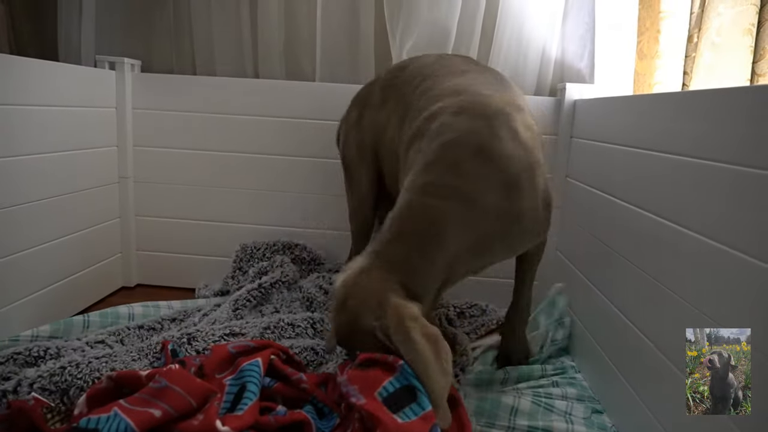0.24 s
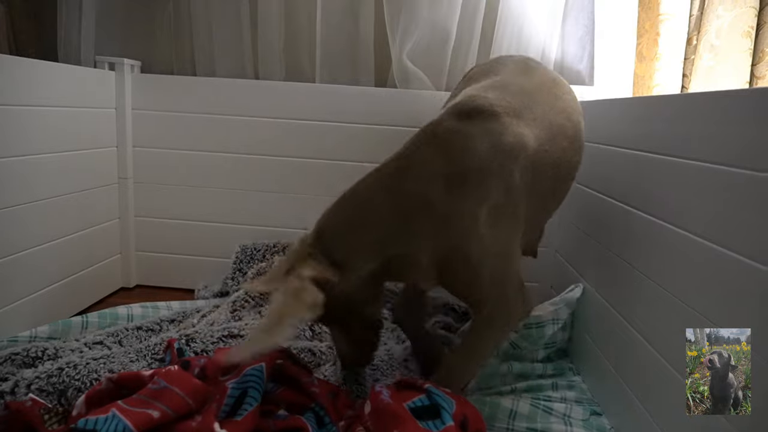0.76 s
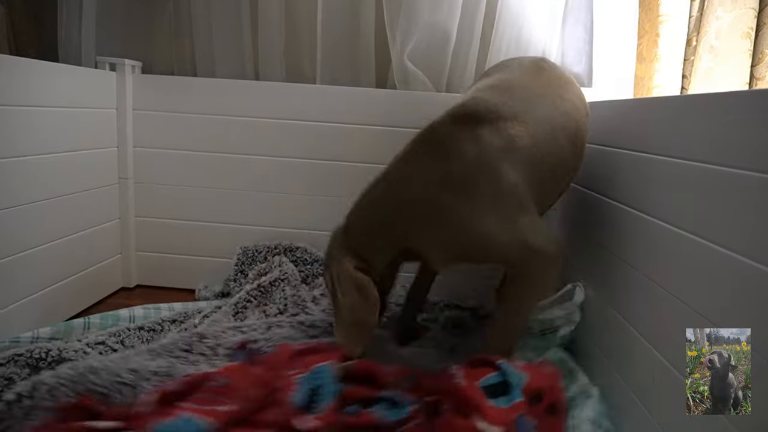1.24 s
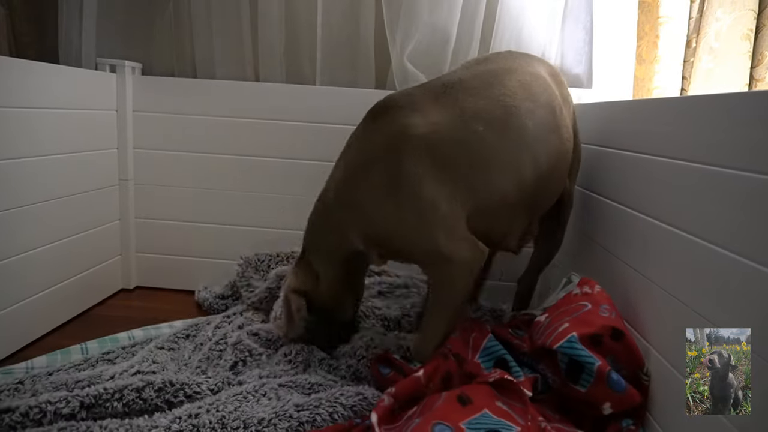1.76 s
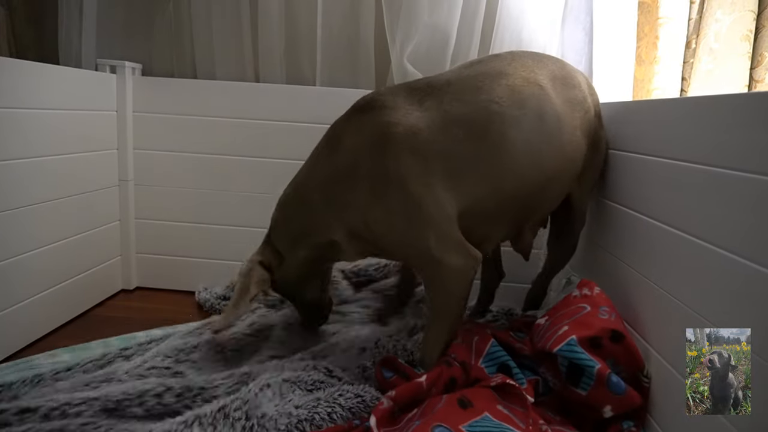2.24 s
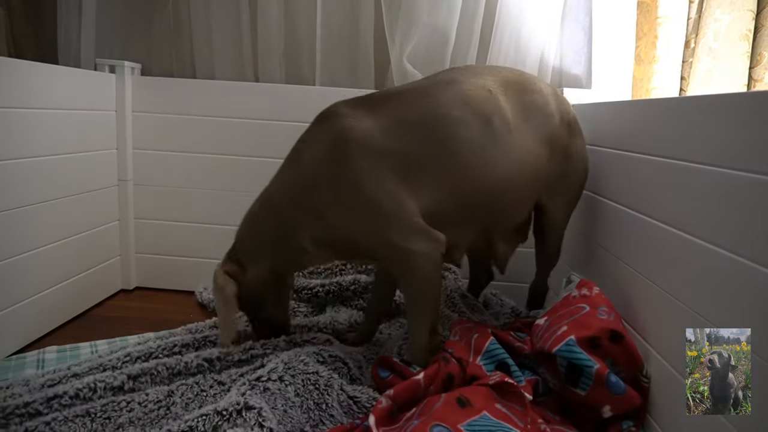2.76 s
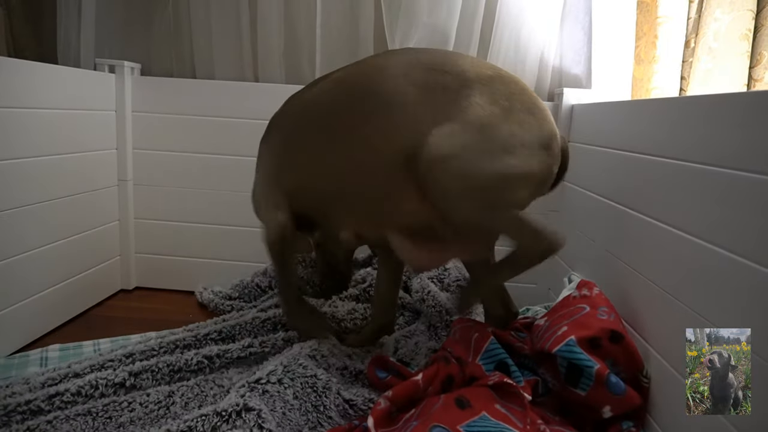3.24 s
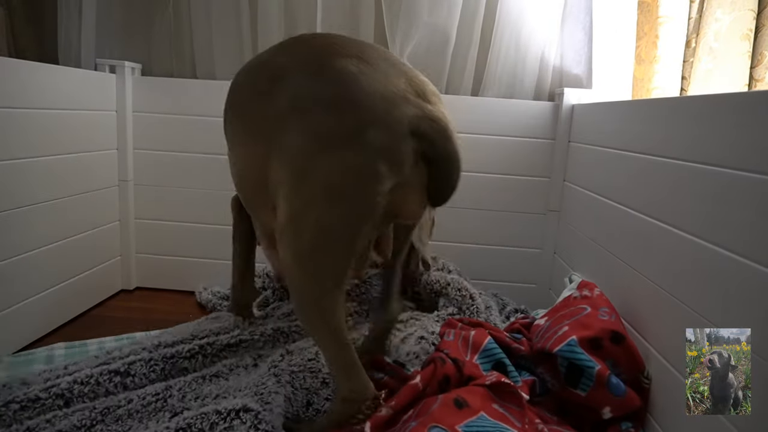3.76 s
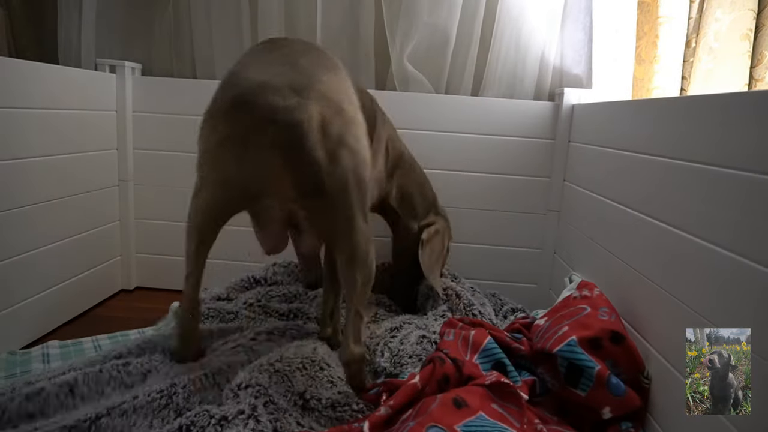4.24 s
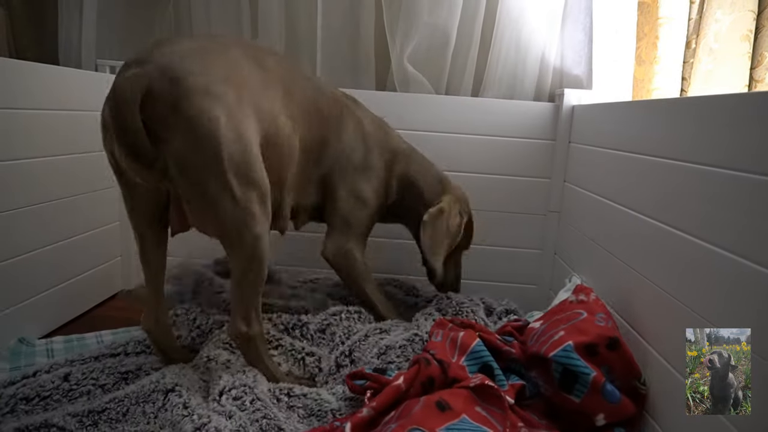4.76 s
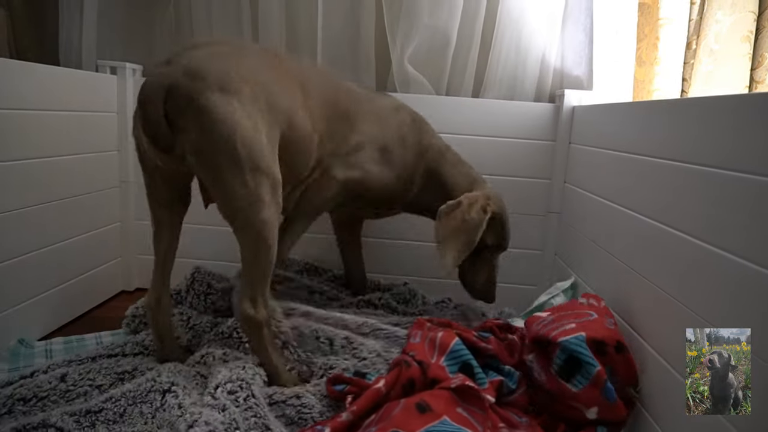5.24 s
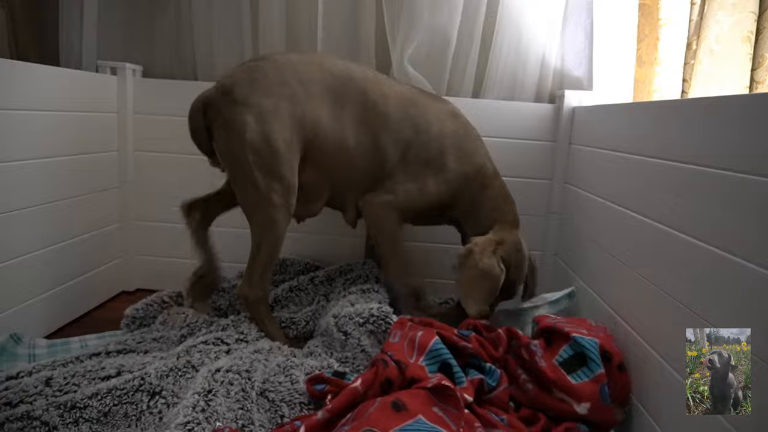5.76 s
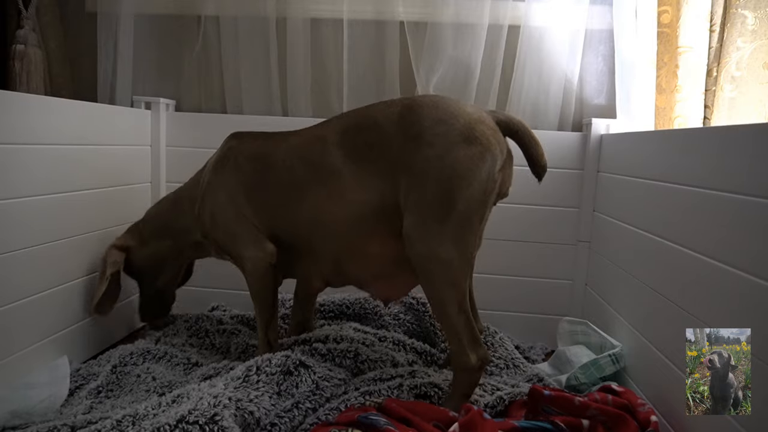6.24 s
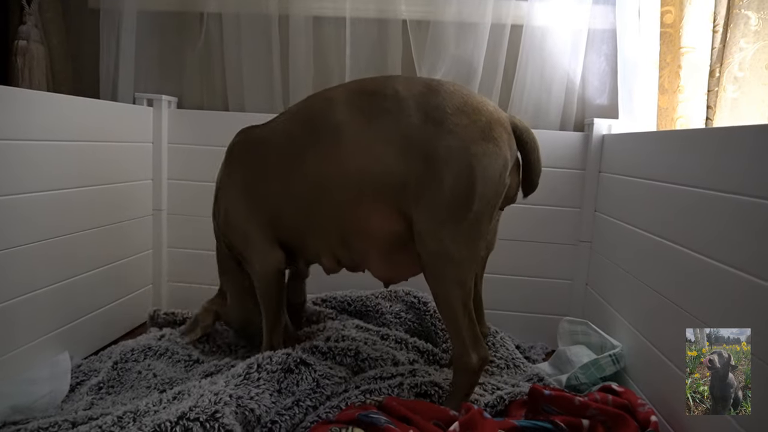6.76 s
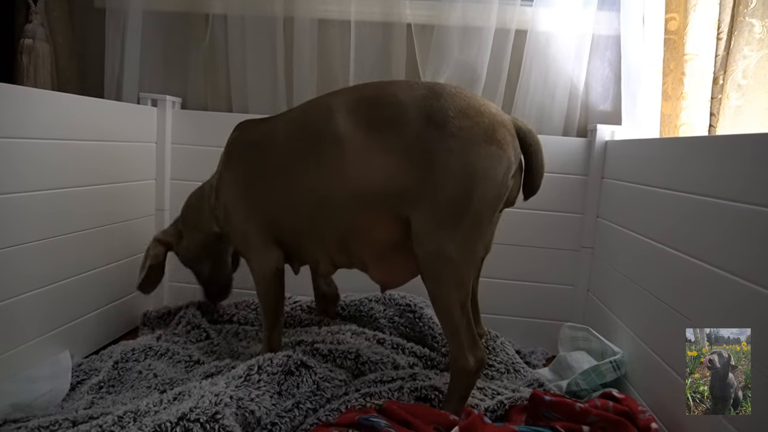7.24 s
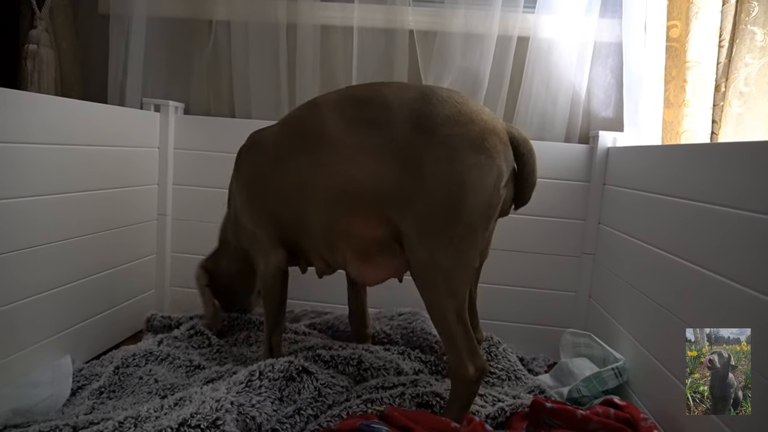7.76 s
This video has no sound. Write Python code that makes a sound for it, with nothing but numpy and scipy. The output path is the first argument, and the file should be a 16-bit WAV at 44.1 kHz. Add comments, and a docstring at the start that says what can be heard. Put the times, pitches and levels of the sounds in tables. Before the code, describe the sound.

Close, uneven scratching and rustling of blankets as a dog claws its bedding, with small cracks and dull thuds in a box.

```python
"""Claws rasp and snag in fleece: a dog digging at its blankets in a panelled whelping box,
close to the microphone of a small camera. The claws stick and slip in the pile, and each catch
cracks and knocks the panels. Paws thump the box floor, and three sniffs hiss through the nose.
Underneath, the floor shakes the camera with a deep rumble over the hush of the room.
One dry click comes late in the digging."""
import sys
import numpy as np
from scipy import signal
from scipy.fft import rfft, irfft, next_fast_len
from scipy.io import wavfile
from scipy.ndimage import uniform_filter1d, map_coordinates

SR = 44100
rng = np.random.default_rng(int(sys.argv[2]) if len(sys.argv) > 2 else 0)


def dump_mix(stems):
    """Bounce the given channels to the path in sys.argv[1] as a 16-bit WAV at rate SR."""
    frames = np.atleast_2d(stems).T  # one column per channel
    limited = np.clip(frames, -1, 1)  # hard clip at full scale
    pcm = np.round(limited * 32767).astype(np.int16)
    wavfile.write(sys.argv[1], SR, pcm)


N = 352800


def amp(db):
    return 10 ** (np.asarray(db) / 20)


def unit(x):
    return x / np.sqrt(np.mean(x ** 2) + 1e-20)


def along(points, hz):
    """(Hz, value) points on a log axis."""
    f, v = np.transpose(points)
    return np.interp(np.log(hz + 1), np.log(f + 1), v)


def curve(rows):
    """One value per sample for each column after the time."""
    s, *cols = np.transpose(rows)
    return np.array([np.interp(np.arange(N) / SR, s, c) for c in cols])


def wobble(rate):
    """A smooth random curve, rate knots a second."""
    return map_coordinates(rng.standard_normal(int(N * rate / SR) + 4), [np.arange(N) * rate / SR])


def filtered(x, response):
    """x times a complex response of frequency."""
    m = next_fast_len(N + SR // 2)
    return irfft(rfft(x, m) * response(np.fft.rfftfreq(m, 1 / SR)), m)[..., :N]


def coloured(x, spectrum):
    """x through a (Hz, dB) spectrum, at rms 1."""
    return unit(filtered(x, lambda hz: amp(along(spectrum, hz))))


def patchy_noise(depth_db, frames=5):
    """White noise with patches of random gain in time and frequency."""
    bins = signal.stft(rng.standard_normal(N), nperseg=256)[2]
    patches = uniform_filter1d(rng.standard_normal(bins.shape), size=3, axis=0)
    patches = uniform_filter1d(patches, size=frames, axis=1)
    return signal.istft(bins * amp(depth_db * unit(patches)), nperseg=256)[1][:N]


# Room tone around the box: freq_hz, level_db
HUSH_SPECTRUM = [(35, -20), (60, -1.5), (211, -1.5), (406, -14.5), (817, -11.5), (1190, -27), (3390, -23.5),
                 (8420, -38.5), (14400, -40), (15800, -47)]

def room_hush():
    """The faint, steady noise of the room, mostly bass."""
    return amp(-64.5) * coloured(patchy_noise(depth_db=3.0), HUSH_SPECTRUM)


# Decay of the room: freq_hz, t60_s
ROOM_DECAY = [(150, 0.84), (1500, 0.21), (10000, 0.13)]

def room_reverb(x):
    """The room answers about 3 ms late, and its low notes ring longest."""
    hz, t, bins = signal.stft(rng.standard_normal(SR // 2), SR, nperseg=256)
    decay = amp(-60 * t / along(ROOM_DECAY, hz)[:, None])
    tail = signal.istft(bins * decay, SR, nperseg=256)[1]
    return signal.fftconvolve(np.pad(x, (130, 0)), tail / np.linalg.norm(tail))[:N]


# Sway of the floor under the camera: freq_hz, level_db
SWAY_SPECTRUM = [(4, -63), (9, 10.5), (13, 15), (25, 4.5), (34, -35), (55, -12.5), (100, -30), (220, -31.5),
                 (900, -53), (1200, -68)]
# Strength of the rumble at the microphone: time_s, level_db
RUMBLE_LEVEL = [(0.0, -36), (0.12, -55.5), (0.8, -47.5), (1.03, -55.5), (1.23, -30), (1.45, -53),
                (1.78, -45), (2.95, -53), (3.45, -45), (3.6, -46.5), (4.68, -44.5), (5.12, -46),
                (5.28, -42.5), (5.75, -56), (5.93, -36.5), (6.08, -50), (6.17, -33), (7.35, -29.5),
                (8.0, -33)]

def floor_rumble():
    """The floor sways under the dog's weight, mostly below hearing, and shakes the camera."""
    sway = coloured(rng.standard_normal(N), SWAY_SPECTRUM)
    sway /= np.sqrt(uniform_filter1d(sway ** 2, SR // 4) + 0.17)  # evens out swells and lulls
    return amp(curve(RUMBLE_LEVEL)[0]) * unit(sway)


def dry_click(start_s=6.156, peak_db=-30.5, relax_s=0.0096):
    """A sudden step that relaxes."""
    t = np.arange(N) / SR - start_s
    return amp(peak_db) * (t > 0) * np.exp(-np.abs(t) / relax_s)


# Resonances of the dog's nose: centre_hz, width_hz, level_db
NOSE_RESONANCES = [(1880, 900, -4), (3520, 340, -3), (4000, 340, -3.5), (4960, 340, -3), (5930, 1200, -6)]
# Sniffs near the microphone: start_s, loudest_s, end_s, level_db, centre_hz, spread_hz
SNIFFS = [(1.89, 1.96, 2.04, -69, 5700, 800), (6.24, 6.63, 6.7, -58.5, 4500, 3000),
          (7.84, 7.92, 7.99, -69, 4000, 900)]

def sniffs():
    """Air drawn through the nose: noise in narrow resonances that swells and stops."""
    def nose(hz):
        return sum((-1) ** k * amp(db) * 1j * hz * width / (centre ** 2 - hz ** 2 + 1j * hz * width)
                   for k, (centre, width, db) in enumerate(NOSE_RESONANCES))

    out, t = np.zeros(N), np.arange(N) / SR
    air = patchy_noise(depth_db=3.8, frames=12)
    hiss = filtered(air, lambda hz: nose(hz) / (1 + (hz / 6900) ** 12))
    for start_s, loudest_s, end_s, level_db, centre_hz, spread_hz in SNIFFS:
        flow = np.sin(np.pi / 2 * np.interp(t, [start_s, loudest_s, end_s], [0, 1, 0])) ** 1.24
        breath = filtered(hiss, lambda hz: np.exp(-((hz - centre_hz) / spread_hz) ** 2))
        out += amp(level_db) * flow * unit(breath)
    return out


def ringing(modes, t, detune, ring_share=1):
    """Struck modes, at new strengths and slightly new pitches on every blow."""
    return sum(amp(db + 3.0 * rng.normal() - 60 * t / (t60_s * ring_share))
               * np.sin(2 * np.pi * hz * (1 + detune * rng.normal()) * t)
               for hz, db, t60_s in modes)


# Modes of the bare box floor: pitch_hz, level_db, t60_s
FLOOR_MODES = [(46.8, -15.5, 0.36), (82.6, -4.5, 0.3), (99.4, -2.5, 0.16), (120.6, -4, 0.23),
               (183.7, -7.5, 0.15), (259, -26, 0.19)]
# Paws landing in the box: touch_s, peak_db, hardness_db
PAW_FALLS = [(0.285, -47, -21), (0.45, -24.5, -7.5), (0.798, -43.5, -13), (1.067, -37, -2),
             (1.323, -34.5, -23), (1.665, -31.5, -3.5), (1.82, -38, -11.5), (2.193, -53, -9),
             (2.574, -35.5, -6), (2.733, -40.5, -15), (2.837, -44, -8), (3.006, -47, -7), (3.109, -23, -10),
             (3.399, -20, -11.5), (3.438, -31.5, -2), (3.843, -41.5, -12), (4.174, -31.5, -15),
             (4.293, -28, -9.5), (4.68, -27.5, -10.5), (4.751, -35.5, 2), (5.021, -20.5, -8),
             (5.045, -23, -11), (5.551, -31, -15), (5.69, -30.5, -8), (5.841, -26, 7), (5.868, -34, 2),
             (6.753, -24.5, -11.5), (6.841, -29.5, -13), (6.911, -25, -1), (6.96, -27.5, -1),
             (7.507, -39, -15), (7.605, -37, -16), (7.758, -42, 0)]

def paw_thumps():
    """A padded push rings the floor; a harder pad reaches higher modes."""
    out, t = np.zeros(N + SR), np.arange(SR // 2) / SR
    soft_onset = 1 - np.exp(-(t / 0.0032) ** 2)
    for touch_s, peak_db, hardness_db in PAW_FALLS:
        modes = [(hz, db + (hardness_db + 4.5) * np.log2(hz / 82), t60) for hz, db, t60 in FLOOR_MODES]
        thump = soft_onset * ringing(modes, t, detune=0.073, ring_share=0.73)  # blankets damp the ring
        start = round((touch_s + 0.005) * SR)  # the weight follows the touch
        out[start:][:len(t)] += amp(peak_db) * thump / np.abs(thump).max()
    return out[:N]


# Rasp of the cloth, fizz of its fibres and scrape on the floor below, each: freq_hz, level_db
CLOTH_SPECTRUM = [(700, -1), (1100, -2.5), (2700, -4), (3300, -1.5), (3900, -10), (5300, -10),
                  (7000, -29.5), (9000, -36)]
FIBRE_SPECTRUM = [(4500, 0), (6500, -1), (9800, -11), (12200, -12), (15800, -13)]
FLOOR_SPECTRUM = [(60, -2), (150, 2.5), (350, -0.5), (550, -7), (830, -1.5), (1050, -13), (1800, -19.5),
                  (2800, -39)]
# Blankets shuffling between strokes: time_s, rasp_db, weight_db (floor relative to rasp)
BLANKET_SHUFFLE = [(0, -61.5, -5), (0.4, -62.5, -14), (0.5, -66, 4), (0.8, -65.5, -5), (0.9, -73, 0),
                   (1.5, -61, -14), (2.1, -82, 0), (2.5, -66, -3), (3.3, -76, 9), (3.78, -60, -4),
                   (4.05, -76, -4), (4.25, -66.5, 10.5), (5.0, -59.5, 5), (5.45, -63, -7), (6.0, -59, 6),
                   (6.15, -55, -1.5), (6.16, -84, 18.5), (6.65, -66.5, 9), (7.25, -70.5, -6), (8.0, -68, 5)]
# Claw strokes at close range: loudest_s, rise_s, hold_s, fall_s, rasp_db, weight_db, bright_db
# Rise and fall are per 20 dB; weight (floor) and bright (fibres) are relative to the rasp.
CLAW_STROKES = [(0.026, 0.015, 0.00073, 0.023, -55.5, 1, -3),
                (0.331, 0.098, 0.0076, 0.035, -45.5, 1.5, -2.5), (0.458, 0.0096, .001, 0.022, -50, 7, -8),
                (0.796, 0.028, 0.002, 0.063, -57.5, 0, -20), (1.088, 0.11, 0.011, 0.18, -60.5, 8.5, -3),
                (1.237, 0.13, 0.021, .15, -40.5, -3, -10.5), (1.315, 0.16, 0.053, 0.12, -39, -1.5, -10),
                (1.554, 0.059, 0.0011, 0.056, -53.5, -3, -9), (1.667, 0.043, 0.0005, 0.044, -44, 1.5, -24),
                (1.943, 0.14, 0.013, 0.064, -61.5, -0.5, -6), (2.053, .03, .001, 0.053, -60.5, -9, -10),
                (2.195, 0.038, 0.024, 0.071, -45.5, 0.5, -20), (2.27, 0.099, 0.00087, 0.21, -42, -1, -10.5),
                (2.566, 0.065, 0.00084, 0.1, -55.5, 4, -11), (2.749, .15, .001, 0.43, -60, -1, -12),
                (2.838, 0.031, 0.0012, 0.026, -53, -15, -9), (3.018, .015, .001, 0.17, -62, -1.5, -24),
                (3.106, 0.028, 0.0015, 0.051, -48, 3.5, -18), (3.195, 0.094, 0.033, 0.069, -51, 3, -3),
                (3.332, 0.11, .001, 0.026, -54.5, -5, -17), (3.378, 0.027, 0.0006, 0.11, -42, 0, -15),
                (3.616, 0.077, 0.013, 0.07, -58, 0.5, -17), (3.829, 0.042, 0.068, 0.036, -48.5, -1, -16),
                (4.116, 0.034, 0.051, 0.028, -51.5, -4.5, -16), (4.312, 0.18, .001, 0.077, -52.5, 0, -11),
                (4.405, 0.082, 0.00064, .11, -51, -1, -27), (4.514, 0.09, 0.00078, 0.26, -46, -11, -12),
                (4.72, 0.14, .005, 0.064, -43.5, 2, -14), (4.75, .04, 0.014, 0.056, -45.5, 5.5, -14),
                (4.892, 0.078, .001, 0.36, -54, 3, -21), (5.02, 0.083, 0.00088, 0.072, -45.5, 8.5, -16),
                (5.1, 0.065, 0.045, 0.055, -37.5, 0.5, -15), (5.225, 0.13, 0.00093, 0.27, -51.5, 3.5, -4.5),
                (5.48, 0.11, .001, .02, -65, -12, -20), (5.55, 0.069, 0.0013, 0.075, -46.5, 5, -12),
                (5.7, 0.025, 0.00088, 0.018, -45, 7.5, -31), (5.792, 0.066, 0.0012, 0.17, -37, 2, -12),
                (5.911, 0.055, 0.00095, 0.13, -42.5, 2.5, -6.5), (6.673, 0.06, 0.0012, 0.013, -52, 0, -29),
                (6.755, 0.059, 0.021, 0.017, -46.5, 2.5, -18), (6.884, 0.093, 0.0012, 0.066, -42.5, 4, -11),
                (6.938, 0.044, 0.00059, 0.017, -36, 2, -19), (6.959, 0.025, .001, .23, -50, 2.5, -9),
                (7.465, 0.027, 0.064, 0.17, -56.5, -7, -14.5), (7.513, 0.063, 0.0017, 0.038, -43.5, 1, -15),
                (7.566, 0.013, 0.0014, 0.12, -47.5, 2, -30), (7.674, 0.027, .07, .03, -52.5, -1, -5.5),
                (7.786, 0.051, .001, 0.07, -57.5, 1, -6)]

def claw_rasp(slip_decay_s=0.0028, fibres_follow=0.9):
    """Claws stick and slip in the pile: clumped slips on a rustle, heard in cloth, fibres and floor."""
    jerks = np.exp(np.minimum(2 * wobble(1400) + 0.25 * wobble(120), 4.5))
    fade = np.exp(-1 / (slip_decay_s * SR))
    slips = signal.lfilter([1], [1, -fade], jerks)  # each starts at once and dies away

    def friction(spectrum, grain):
        return coloured(slips ** grain * patchy_noise(depth_db=-0.5), spectrum)

    cloth = friction(CLOTH_SPECTRUM, grain=0.41)
    fibres = friction(FIBRE_SPECTRUM, grain=0.12)
    floor = friction(FLOOR_SPECTRUM, grain=0.35)
    shuffle_db, heavy_db = curve(BLANKET_SHUFFLE)
    power = amp([shuffle_db, shuffle_db + heavy_db, shuffle_db - 6]) ** 2  # cloth, floor, fibres
    for loudest_s, rise_s, hold_s, fall_s, rasp_db, weight_db, bright_db in CLAW_STROKES:
        near = slice(max(round((loudest_s - 0.4) * SR), 0), round((loudest_s + 0.6) * SR))
        t = np.arange(N)[near] / SR - loudest_s
        loss_db = 20 * np.maximum(0, np.maximum(-t / rise_s, (t - hold_s) / fall_s))
        layers_db = np.array([-loss_db, weight_db - loss_db, bright_db - fibres_follow * loss_db])
        power[:, near] += amp(rasp_db + layers_db) ** 2
    return np.sum(np.sqrt(power) * [cloth, floor, fibres], axis=0)


def small_snags():
    """One lesser catch somewhere in each stroke, as rows like those of LOUD_SNAGS."""
    rows = []
    for loudest_s, rise_s, hold_s, fall_s, rasp_db, *_ in CLAW_STROKES:
        when, force, pitch, knock = rng.uniform(-0.82, 1, 4)
        reach_s = hold_s / 2 + 0.25 * (fall_s if when > 0 else rise_s)
        start_s = max(loudest_s + hold_s / 2 + when * reach_s, 0)
        rows.append((start_s, rasp_db + 4 + 4 * force, 2200 * np.exp(0.45 * pitch), -12 + 8 * knock))
    return rows


# Modes of the box panels: pitch_hz, level_db, t60_s
PANEL_MODES = [(828, -4.5, 0.046), (637, -7, 0.014), (400, -12, 0.025)]
# The loudest catches at close range: start_s, crack_db, pitch_hz, knock_db (relative to the crack)
LOUD_SNAGS = [(0.0252, -46, 1520, -19), (0.0547, -57, 1320, 15), (0.0832, -39.5, 1300, -3),
              (0.2945, -39, 2320, 3.5), (0.3486, -44, 1620, -28), (0.4585, -35, 3600, -5),
              (0.619, -45, 3380, -22), (0.8025, -42.5, 1680, 0.5), (1.0068, -47, 2590, -12),
              (1.0682, -44, 1960, 3.5), (1.2094, -30, 1740, -7), (1.2346, -23.5, 2330, -9),
              (1.3178, -24.5, 2800, -16), (1.3392, -31, 3300, 2), (1.4066, -38, 3290, 3),
              (1.4694, -40, 1900, 3), (1.6486, -35, 2060, -10), (1.761, -53, 2530, -11),
              (1.7893, -48, 2050, -17), (1.8208, -49, 2480, -3), (1.8582, -49.5, 1500, -17),
              (1.907, -46, 1590, -1), (2.0448, -50.5, 1850, 2), (2.177, -40.5, 1780, -5),
              (2.2518, -31, 1610, -1), (2.2715, -22, 1400, -8), (2.4415, -36, 3440, -31),
              (2.468, -41.5, 1430, -16), (2.7317, -44.5, 1430, -16), (2.8325, -44, 1360, -20),
              (3.0927, -39.5, 1270, -2), (3.1921, -33, 3520, -23), (3.2188, -33.5, 3400, 0),
              (3.374, -33.5, 2860, -25), (3.3974, -42, 2870, 9), (3.5508, -49, 3180, -20),
              (3.8277, -34.5, 1610, -14), (3.8721, -43, 3350, -6), (3.896, -43, 2500, 1),
              (4.017, -56.5, 2500, 7), (4.1175, -33.5, 1650, -10), (4.174, -35, 1740, 5),
              (4.2972, -36, 2560, -18), (4.4107, -36.5, 1750, -16), (4.5364, -33, 1930, -14),
              (4.592, -36, 3220, -14), (4.6169, -44, 3500, -20), (4.711, -31, 1710, -19),
              (4.9353, -39.5, 3080, -20), (5.0187, -38, 1420, -3), (5.0789, -33, 1400, -5),
              (5.1371, -33.5, 1570, 1), (5.2026, -35, 3340, -17), (5.5872, -38.5, 2080, -4),
              (5.6582, -37.5, 3050, -6), (5.6962, -29, 1340, 6), (5.7533, -31, 1450, -15),
              (5.7914, -29.5, 3300, 8), (5.8406, -23.5, 2020, 0), (5.9624, -34.5, 2550, -13),
              (6.6778, -35.5, 1840, -21), (6.7251, -47.5, 2800, 6), (6.8633, -37, 1814, -4),
              (6.875, -40, 1850, -19), (6.9206, -35, 3370, -9), (7.465, -38.5, 3280, -19),
              (7.5032, -38, 1460, 6), (7.567, -43.5, 3290, -23), (7.6658, -33.5, 1630, -8),
              (7.7113, -36, 1580, -17)]

def claw_snags():
    """A claw catches: a short pitched crack, a spit of fibre noise and a knock on the panels."""
    out, t = np.zeros(N + SR), np.arange(SR // 10) / SR
    hz = np.fft.rfftfreq(len(t), 1 / SR)
    pulse = 40 * t / 0.0015 * amp(-60 * t / 0.00094)
    envelope = amp(-60 * t / 0.0088) * (1 - np.exp(-t / 0.00051))
    highpass = 1j * hz / (8000 + 1j * hz)
    for start_s, crack_db, pitch_hz, knock_db in LOUD_SNAGS + small_snags():
        burst = rfft((rng.standard_normal(len(t)) + pulse) * envelope)
        width_hz = 1.05 * pitch_hz
        bandpass = 1j * hz * width_hz / (pitch_hz ** 2 - hz ** 2 + 1j * hz * width_hz)
        crack = irfft(burst * bandpass ** 2, len(t))
        spit = irfft(burst * highpass ** 2, len(t))
        spit_db = -36 + 16 * np.log2(pitch_hz / 2000)  # finer catches spit more
        knock = amp(knock_db) * ringing(PANEL_MODES, t, detune=0.05)
        catch = crack / np.abs(crack).max() + amp(spit_db) * spit / np.abs(spit).max() + knock
        out[round(start_s * SR):][:len(t)] += amp(crack_db) * catch
    return out[:N]


def scene():
    """All that reaches the one microphone; only the snags set the room ringing."""
    snags = claw_snags()
    dog = claw_rasp() + snags + amp(-14) * room_reverb(snags) + paw_thumps() + sniffs()
    return (dog + floor_rumble() + room_hush() + dry_click())[None]


def record(dry):
    """The camera's gain stage rounds off the peaks, and nothing passes above its band limit."""
    ceiling, top_hz = 0.084, 15800
    rounded = dry / (1 + np.abs(dry / ceiling) ** 6) ** (1 / 6)
    return filtered(rounded, lambda hz: hz < top_hz)


dry = scene()
out = record(dry)
dump_mix(out)
```